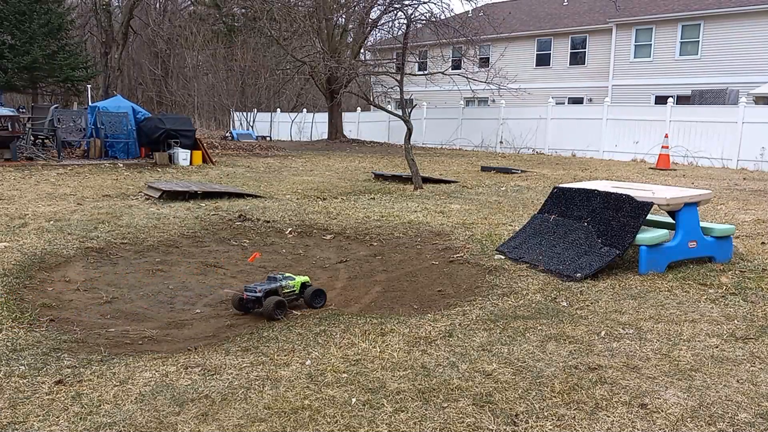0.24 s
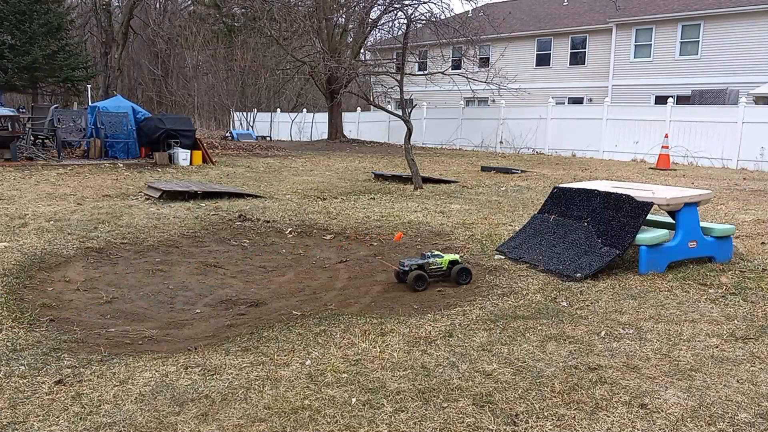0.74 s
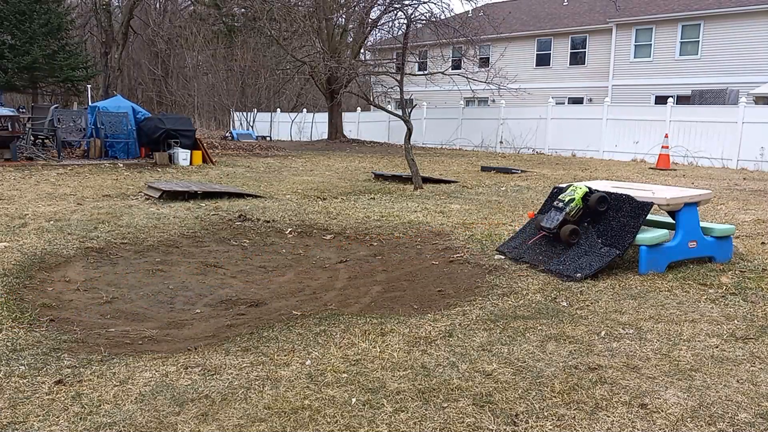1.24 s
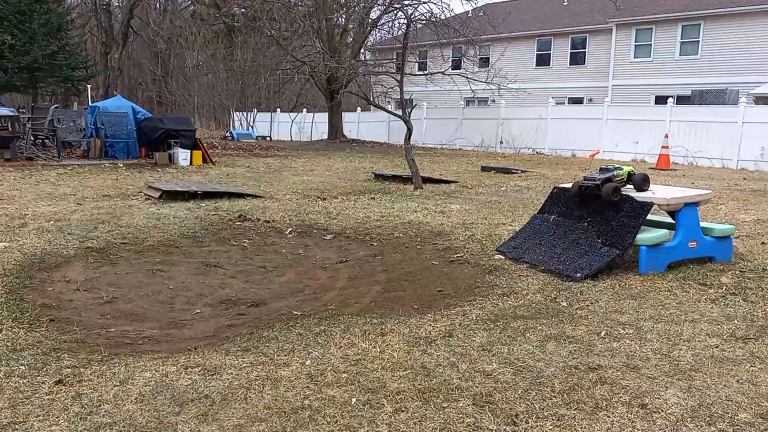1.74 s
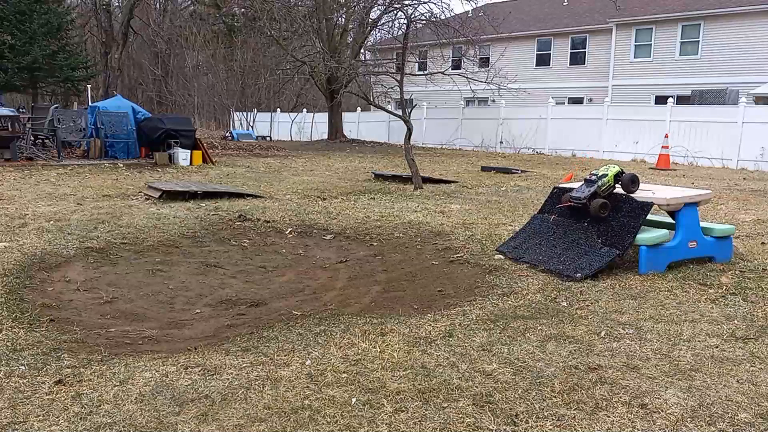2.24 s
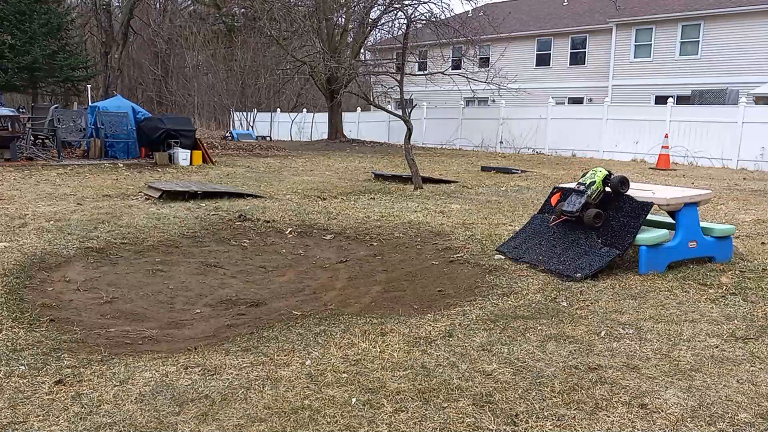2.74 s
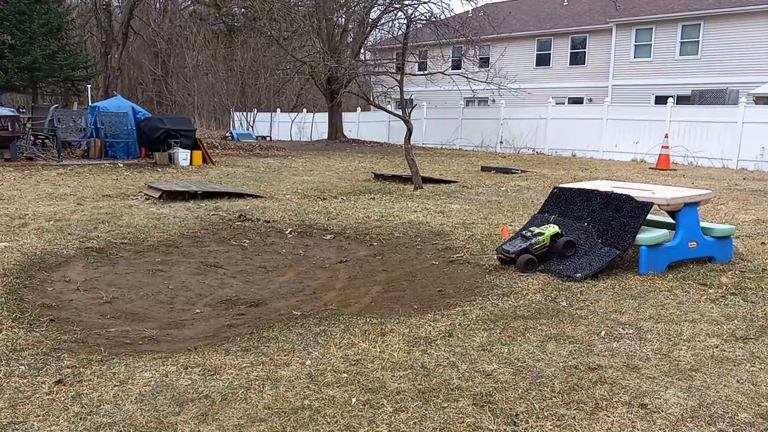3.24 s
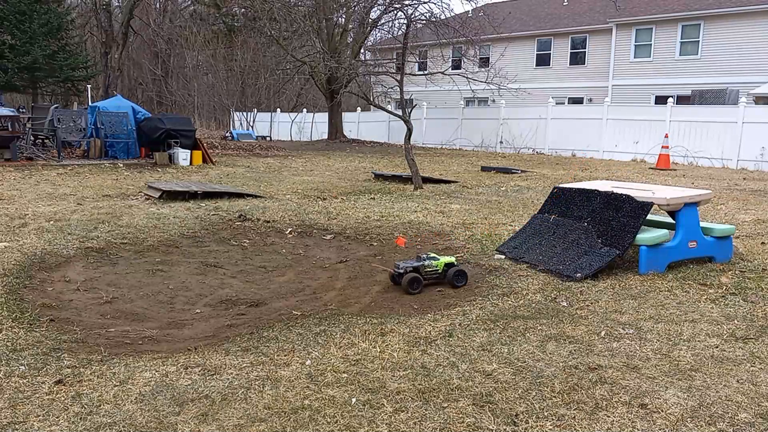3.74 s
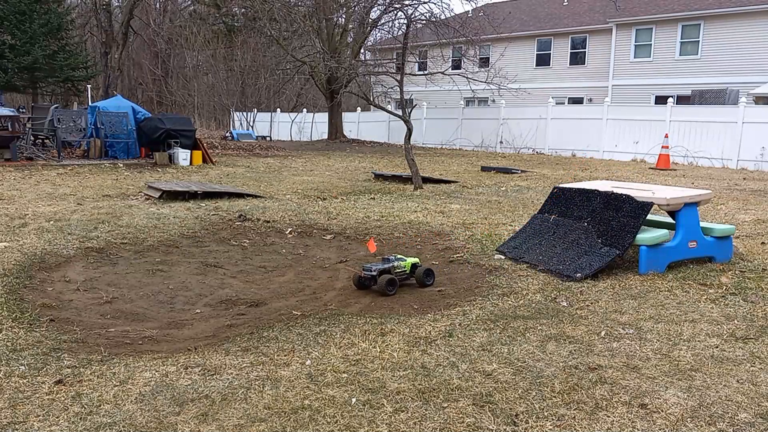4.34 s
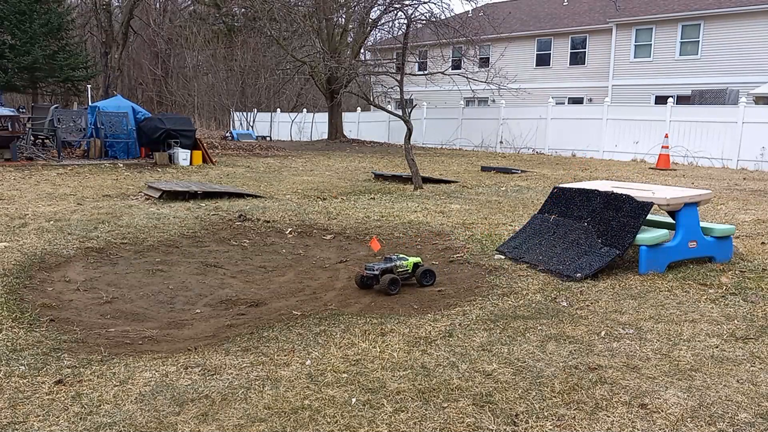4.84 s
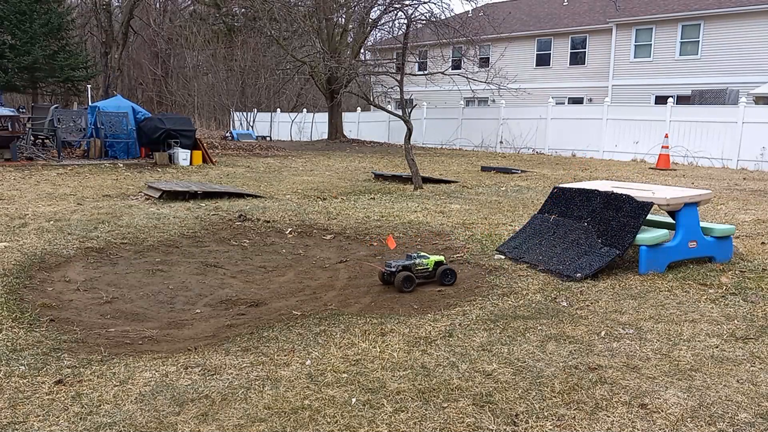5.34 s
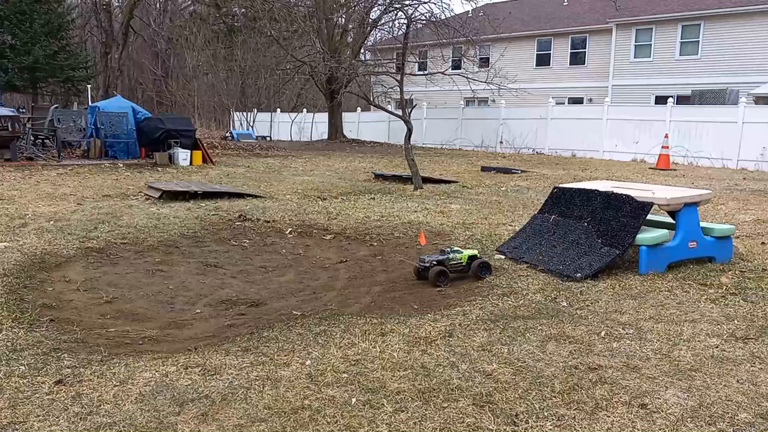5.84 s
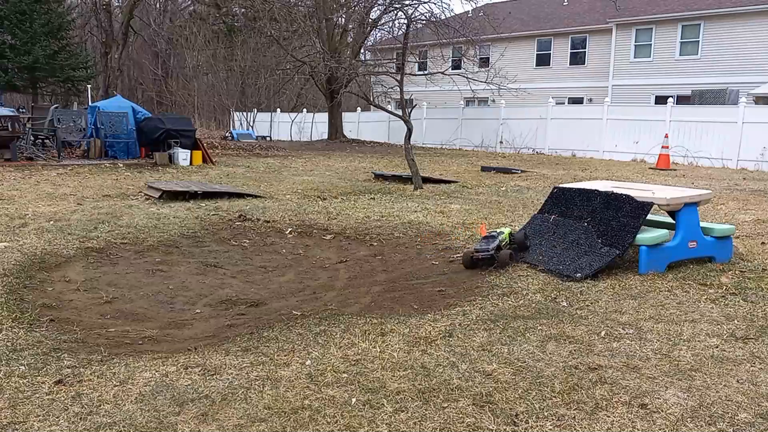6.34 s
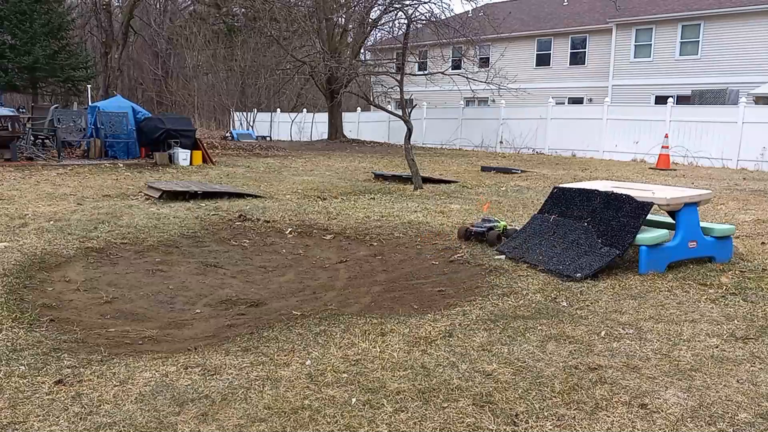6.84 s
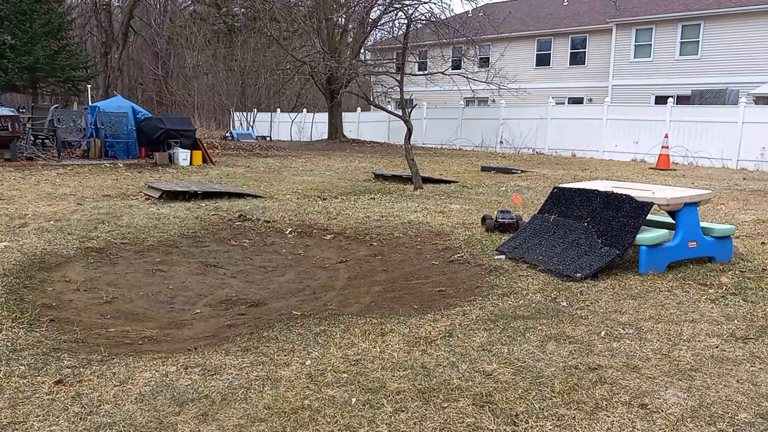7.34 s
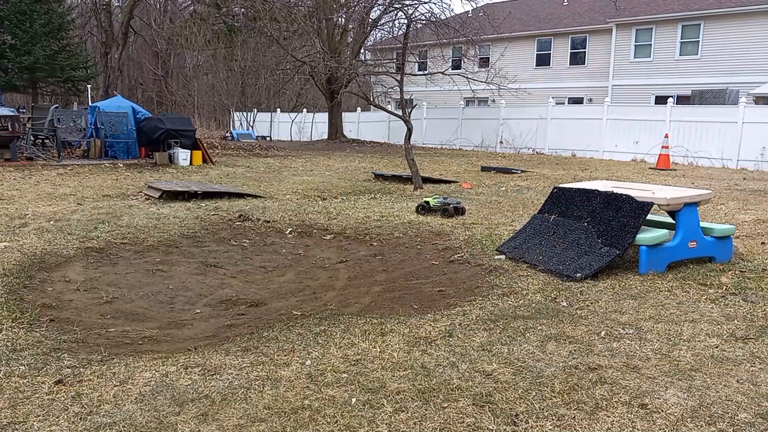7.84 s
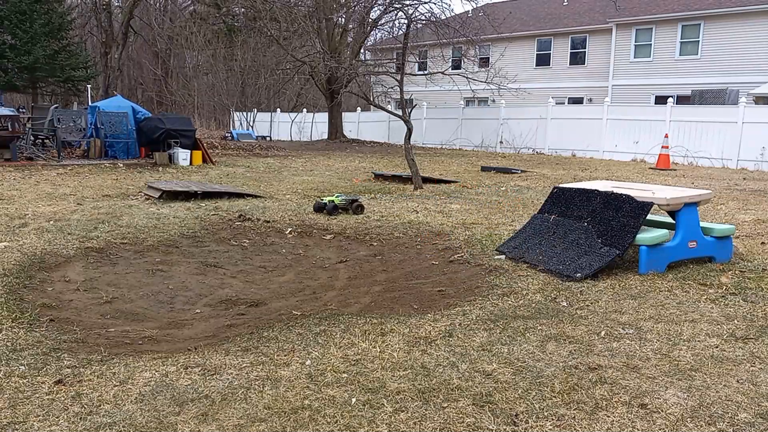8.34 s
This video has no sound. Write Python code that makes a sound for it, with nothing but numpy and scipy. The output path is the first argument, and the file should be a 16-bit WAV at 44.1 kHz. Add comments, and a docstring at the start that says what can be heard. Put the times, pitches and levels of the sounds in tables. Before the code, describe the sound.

A small electric radio-controlled truck drives close by in a backyard, its gears whining and rasping with each blip of the throttle. The tyres scrub over dirt and drum up a ramp, where the plastic chassis knocks hard twice. Short pulls with thin squeaks follow, then a longer run, a sharp clack, and the truck drives away. An engine drones in the distance and a breeze swells on the microphones at the end.

```python
"""A yard of dirt and dry grass, two microphones close to a small electric radio-controlled truck.
It is moving from the start, gears whining and rasping with each blip of the throttle, while an engine
drones far off and a house front sends back an echo. The tyres scrub and drum up a ramp, and the plastic
chassis knocks hard near 1.6 and 2.4 s. From 3 to 5.5 s the truck goes in short pulls, with thin squeaks.
It comes back down, clacks sharply at 6.7 s and drives away as the breeze swells on the microphones."""
import sys
import numpy as np
from scipy import signal
from scipy.fft import rfft, irfft, next_fast_len
from scipy.io import wavfile
from scipy.ndimage import uniform_filter1d, map_coordinates

SR = 44100
rng = np.random.default_rng(int(sys.argv[2]) if len(sys.argv) > 2 else 0)


def wav_out(sig):
    """Save sig, one row per channel (or a flat mono array), as 16-bit PCM at SR to the path in sys.argv[1]."""
    wavfile.write(sys.argv[1], SR, np.round(np.clip(np.atleast_2d(sig).T, -1, 1) * 32767).astype(np.int16))


N = 379260
TIME = np.arange(N) / SR

# pulls of the throttle, whine and tyres relative to the rasp:
# start_s, held_s, aimed_tooth_hz, spin_up_s, coast_s, rasp_db, whine_db, tyre_db
THROTTLE = [(-0.28, 0.98, 1511, 0.029, 0.07, -32.5, 3.5, -5.0),
            (0.641, 0.912, 6681.34, 0.241, 0.291, -30.5, -2, -8.5),
            (1.948, 0.478, 5099, 0.07, 0.104, -33.5, -1.5, -7.5),
            (2.973, 0.832, 445.427, 0.106, 0.209, -29, -22, -4),
            (3.585, 0.76, 994.384, 0.274, 0.118, -34.5, -0.5, -2.0),
            (4.942, 0.24, 2100.84, 0.044, 0.086, -31.5, 3.5, -4),
            (5.39, 0.19, 2992, 0.049, 0.149, -29.5, -2.0, -4.5),
            (5.74, 0.192, 3103, 0.03, 0.086, -30, -7, -6.5),
            (5.974, 0.616, 5916, 0.213, 0.447, -31.5, -1.5, -6),
            (7.107, 1.051, 4504, 0.08, 0.29, -37.5, -2, -7),
            (8.344, 0.308, 1442, 0.017, 0.086, -37, 3, 1.5)]
# the motor flares as a bump frees the wheels and sags as they grip: centre_s, width_s, speed_share
FLARES = [(.024, .018, .35), (.11, .012, .2), (0.151, .01, -.1), (0.199, .02, .18), (.253, .012, .35),
          (0.411, .032, .23), (0.548, .012, .16), (.83, .012, -.09), (1.335, .025, .2), (2.093, .025, .33),
          (3.732, .025, .57), (3.946, .025, .38), (4.04, .024, .18), (4.309, .033, .48), (5.033, .016, .45),
          (5.08, .01, .33), (5.131, .009, .42), (5.152, .008, -.13), (5.875, .025, .1), (6.31, .012, .12),
          (7.51, .022, .09), (7.625, .018, .26), (7.659, .01, -.12), (7.699, .008, .1), (7.746, .011, .22),
          (7.79, .013, .2), (7.87, .014, -.2), (7.94, .01, -.14), (7.967, .012, .24), (8.011, .012, .27),
          (8.04, .01, -.26), (8.475, .017, .3), (8.519, .012, -.1), (8.588, .024, .37)]
# how hard the ground loads the gears: time_s, gain_db
TRACTION = [(.65, -1.5), (1.08, -1), (1.2, 0), (1.36, -0.5), (1.55, -6), (1.72, 6), (2.05, 3), (2.4, 1.5),
            (2.95, 5), (3.17, -0.5), (3.58, -7), (3.95, 0.5), (4.3, 1.5), (5, 1), (6.05, 0), (6.42, -0.5),
            (6.6, -2.5), (7.15, -1), (7.7, 2.5), (8.3, 0)]
# the teeth sing best between a crawl and full speed: tooth_hz, gain_db
WHINE_RANGE = [(100, -50), (450, -3), (700, -1), (4500, 1), (6500, -8)]
# colour the gearbox gives the whine's overtones: frequency_hz, gain_db
GEARBOX = [(300, 5), (900, -5), (1700, -1.5), (2650, 1), (3500, -15), (5200, 4.5), (6800, 8), (8500, -6),
           (16000, -9)]
# colour of the plastic chassis: frequency_hz, gain_db
CHASSIS = [(500, -23), (1000, -6), (1500, -0.5), (2400, -8), (3400, 0), (5200, 3), (6700, -1.5), (8200, -6),
           (9700, -10), (12000, -9.5), (16000, -18.5)]
# ringing of the gear case and of the body shell: pitch_hz, width_hz, gain_db
CASING_MODES = [(5400, 470, 5), (6680, 540, 3.5)]
SHELL_MODES = [(1483, 288, -14.5), (2478, 1200, -3)]
# how well the shell radiates towards the microphones: time_s, gain_db
FACING = [(3, -9), (3.7, -11), (4.15, -2), (5, -18), (5.9, -4.5), (7.3, -34), (8.6, -34)]
# orders of the unbalanced motor shaft: multiple, gain_db
SHAFT_ORDERS = [(1, -1), (2, 5.5), (3, 5), (4, 9), (5, -14)]
# shaft buzz of unloaded wheels: time_s, level_db
FREE_SPIN = [(1.9, -49), (2.1, -48), (2.27, -42), (2.34, -30.5), (2.5, -49), (6, -83), (6.45, -62),
             (7, -80)]
# colours of the rolling tyres and of the grit they fling: frequency_hz, gain_db
TYRES = [(80, -1.5), (170, -2.5), (400, -2), (580, 1), (850, -5), (1300, -8.5), (2200, -11.5),
         (6000, -28.5)]
SPRAY = [(1500, -6), (4000, -13), (7500, 0.5), (9700, -10), (12000, 2), (16000, -2.5)]
# ringing of the ramp's panel: pitch_hz, width_hz, gain_db
RAMP_MODES = [(234.4, 37, -4), (329, 102, -2.5)]
# the panel's drumming against the tyre noise: time_s, gain_db
ON_RAMP = [(.9, -2), (1.2, 0), (1.6, -31), (2.45, -3.5), (5.9, -14.5), (6.25, -3.5), (6.8, -51)]
# the far engine's strongest order: time_s, pitch_hz, level_db
ENGINE = [(0, 90, -40), (.2, 89, -30), (.9, 87, -27.5), (1.7, 85, -25), (2.5, 88, -30), (3.15, 87, -31.5),
          (3.4, 82, -43), (3.8, 74, -46), (4.5, 76, -60), (4.9, 77, -40), (5.5, 77, -35), (6, 76, -50),
          (8.6, 76, -53)]
# its orders against the strongest: multiple, gain_db
ENGINE_ORDERS = [(1, 0), (11 / 8, -8.5), (14 / 8, -12.5), (17 / 8, -28.5)]
# its second harmonic: time_s, level_db
ENGINE_OCTAVE = [(0, -63), (3.4, -47.5), (3.8, -48.5), (4.5, -62), (4.9, -36.5), (5.4, -40.5), (6, -47),
                 (8.6, -63)]
# colours of the neighbourhood's murmur and of wind on a microphone: frequency_hz, gain_db
YARD = [(20, -43), (70, 5.5), (150, 2), (300, -9), (500, -18), (780, -14.5), (1300, -23.5), (1900, -26.5),
        (2800, -38.5), (6000, -38), (16000, -48)]
WIND_RUMBLE = [(12, -46), (20, -26), (76, 3.5), (300, -19.5), (390, -28), (660, -120)]
# breeze on the microphones: time_s, level_db
BREEZE = [(0, -39), (1, -33), (2.5, -52), (3.3, -39.5), (3.7, -61), (4.6, -60), (5.4, -45.5), (6.6, -36.5),
          (7.1, -40.5), (7.5, -35), (7.98, -39.5), (8.1, -22), (8.35, -32.5), (8.6, -28.5)]
# chassis contacts, thump relative to the level: start_s, level_db, thump_db
KNOCKS = [(0.2624, -34, -6), (1.6407, -16, -0.5), (1.6613, -19, -6), (2.3941, -19, 4), (2.423, -20.5, 3.5),
          (2.6435, -43, -1), (2.7802, -40, -5.5), (3.0463, -36, -3.5), (3.31, -33, -12), (3.47, -37, -1),
          (3.567, -44.5, 3), (3.84, -40.5, 3.5), (4.929, -40, -4), (4.9533, -39, 3), (5.3976, -33, -6),
          (6.6729, -13, -16), (6.75, -29, -4), (6.891, -34, -15), (8.3397, -26, -11)]
# colour of the hollow thump: frequency_hz, gain_db
THUMP = [(70, -27), (170, -4.5), (260, -15), (600, -19), (1200, -9), (2500, -10.5), (8000, -32)]
# the tread growls as a spinning wheel grips: start_s, length_s, start_hz, end_hz, level_db
SCRUBS = [(.82, 0.16, 492, 643, -36), (1.638, 0.044, 1313, 793, -32.5), (2.39, 0.066, 779, 168, -22),
          (2.44, .09, 421, 240, -34.5), (3.701, 0.066, 691, 647, -47.5), (3.841, 0.061, 647, 682, -44),
          (5.818, .06, 539, 582, -40.5), (6.13, 0.16, 401, 522.5, -36.5), (6.223, 0.068, 282, 238, -33.5),
          (6.64, 0.059, 567, 333, -37), (7.34, 0.082, 683, 434, -45), (7.85, 0.41, 620, 567, -42.5)]
# the tyres dig in on a landing or a hard bump: start_s, held_s, level_db
CRUNCHES = [(1.05, 0.38, -32), (1.645, 0.046, -27.5), (2.406, 0.02, -18.5), (3.484, 0.0075, -42),
            (4.452, 0.0079, -46.5), (5.84, 0.044, -34), (6.211, 0.062, -30), (6.65, .012, -30.5),
            (7.63, 0.037, -31)]
# thin squeaks while the truck is nearly at rest: start_s, held_s, pitch_hz, level_db
SQUEAKS = [(3.104, .11, 3444, -49), (4.398, .05, 4823, -57), (4.398, 0.049, 9060, -66),
           (4.396, 0.055, 10510, -65), (4.803, 0.069, 2202, -60.5), (4.805, 0.061, 5700, -62.5),
           (5.267, .085, 4829, -49.5), (5.266, 0.08, 10740, -64)]
# where the truck is, positive to the right of the microphones: time_s, left_lag_us
BEARING = [(0, -150), (.7, 3.5), (1.15, 122), (1.5, 159), (3.2, 129), (3.9, 8), (5.3, 17), (5.9, 52),
           (6.4, 85), (6.9, 68), (7.5, 80), (8, 40), (8.6, -66)]

SWITCH_HZ, TOP_HZ = 8050, 15850  # the speed controller's tone; the upper band limit
REFERENCE_HZ, REST_HZ = 3000, 30  # tooth rates: where speed adds no gain, and at rest
RASP_DB_PER_OCTAVE, WHINE_DB_PER_OCTAVE, TYRE_DB_PER_OCTAVE = 6, 5, 4.5  # faster is louder
LOAD_DB, WHINE_LOAD_DB = 2.5, 2.5  # teeth pressed together while the truck gathers speed
COAST_DB, WHINE_COAST_DB = -2, -2.5  # coasting teeth are slack and rattle more than they sing
RASP_FLARE_DB, WHINE_FLARE_DB = 2, 4.5  # gain per share of flare
RASP_SLACK_DB, WHINE_SLACK_DB, TAKE_UP_S = -1, -13, 0.013  # soft until the gears' play is taken up
RASP_FADE_DB, WHINE_FADE_DB = -7.5, -8.5  # further loss from letting go to standstill
UNSETTLED_DB, SING_AFTER_S = -12, .035  # the whine is weaker until the teeth settle into a tone
JOLT_DB, JOLTS_PER_S = 1.0, 21  # uneven ground shakes the rasp
WHINE_FLICKER_DB, FLICKERS_PER_S = 2, 35  # the mesh sings in fits
HUNT_SHARE, HUNTS_PER_S = .02, 32  # the wheels slip and grip while the speed changes
BLEND_S = 0.004  # the gears take up a change of load over this time
SETTLE_DB, SETTLE_S = -14, 0.048  # after-rattle of loose parts
CRUNCH_RISE_DB_PER_S, CRUNCH_FALL_DB_PER_S = 1506, 213


def amp(db):
    """Decibels to gain."""
    return 10 ** (np.asarray(db) / 20)


def unit(x):
    """Scale to rms 1."""
    return x / np.sqrt(np.mean(x ** 2) + 1e-20)


def along(points, hz):
    """Read (frequency_hz, value) points on a log axis."""
    point_hz, values = np.transpose(points)
    return np.interp(np.log(np.abs(hz) + 1), np.log(point_hz + 1), values)


def curves(rows):
    """One value per sample for each column after the time."""
    time_s, *columns = np.transpose(rows)
    return [np.interp(TIME, time_s, column) for column in columns]


def wobble(rate):
    """A smooth random curve with rate knots a second."""
    return map_coordinates(rng.standard_normal(int(N * rate / SR) + 4), [TIME * rate], mode="nearest")


def phase_of(hz):
    """Running angle of a changing frequency."""
    return 2 * np.pi * np.cumsum(hz) / SR


def filtered(x, response):
    """x through a response given as a function of frequency."""
    size = next_fast_len(N + SR // 2)
    return irfft(rfft(x, size) * response(np.fft.rfftfreq(size, 1 / SR)), size)[..., :N]


def coloured(x, spectrum):
    """x through a (frequency_hz, gain_db) colour that keeps the power of white noise."""
    return filtered(x, lambda hz: unit(amp(along(spectrum, hz))))


def scattered(apart):
    """Stereo noise of rms 1, partly unlike at the two microphones."""
    return unit(rng.standard_normal(N) + apart * rng.standard_normal((2, N)))


def grains(per_s, spread_db):
    """Tiny impacts of random size, rms 1."""
    hit = rng.random(N) < per_s / SR
    return unit(hit * rng.choice([-1, 1], N) * amp(spread_db * np.minimum(rng.exponential(size=N), 4)))


def add(track, start_s, sound):
    """Mix a sound in at start_s."""
    part = track[max(round(start_s * SR), 0):][:len(sound)]
    part += sound[:len(part)]


def drive():
    """The motor spins up at each pull and friction slows it evenly; speed and load set the levels."""
    start, held, aim_hz, spin_up, coast, *levels = np.transpose(THROTTLE)[:, :, None]
    age = np.maximum(TIME - start, 0)
    loads = np.exp(-np.minimum(age, held) / spin_up)
    coasted = np.clip((age - held) / coast, 0, 1)
    rates = aim_hz * (1 - loads) * (1 - coasted)
    pull = rates.argmax(axis=0)  # the pull that drives the motor fastest rules
    ruling = lambda x: np.broadcast_to(x, rates.shape)[pull, np.arange(N)]
    eased = lambda x: uniform_filter1d(ruling(x) * 1.0, int(BLEND_S * SR))
    flare = sum(share * np.exp(-.5 * ((TIME - s) / width) ** 2) for s, width, share in FLARES)
    hunt = HUNT_SHARE * np.sqrt(np.maximum(ruling(loads), ruling(coasted))) * wobble(HUNTS_PER_S)
    tooth_hz = np.maximum(ruling(rates), REST_HZ) * (1 + flare) * (1 + hunt)

    octaves = np.log2(tooth_hz / REFERENCE_HZ)
    slack = np.exp(-ruling(age) / TAKE_UP_S)
    unsettled = np.exp(-(ruling(age) / SING_AFTER_S) ** 2)
    load, coasting, spent = eased(loads), eased(age > held), eased(coasted)
    pull_db, sing_db, grip_db = [eased(db) for db in levels]
    effort_db = pull_db + curves(TRACTION)[0] + LOAD_DB * load + COAST_DB * coasting
    rasp_db = (effort_db + RASP_DB_PER_OCTAVE * octaves + RASP_FLARE_DB * flare
               + RASP_SLACK_DB * slack + RASP_FADE_DB * spent + JOLT_DB * wobble(JOLTS_PER_S))
    whine_db = (effort_db + sing_db + WHINE_DB_PER_OCTAVE * octaves + along(WHINE_RANGE, tooth_hz)
                + WHINE_SLACK_DB * slack + UNSETTLED_DB * unsettled + WHINE_LOAD_DB * load
                + WHINE_COAST_DB * coasting + WHINE_FADE_DB * spent
                + WHINE_FLARE_DB * flare + WHINE_FLICKER_DB * wobble(FLICKERS_PER_S))
    rolling_db = pull_db + grip_db + TYRE_DB_PER_OCTAVE * octaves
    return tooth_hz, whine_db, after_rattle(rasp_db), rolling_db


def after_rattle(rasp_db):
    """Loose parts go on rattling after the drive stops: the rasp's level with a short tail, in dB."""
    keep = np.exp(-1 / (SETTLE_S * SR))
    power = amp(rasp_db) ** 2
    tail = signal.lfilter([1 - keep], [1, -keep], power)
    return 10 * np.log10(power + amp(SETTLE_DB) ** 2 * tail)


def gears(tooth_hz, whine_db, rasp_db):
    """Meshing teeth sing at their rate and rattle the chassis; the unbalanced motor shaft buzzes."""
    speed = tooth_hz / tooth_hz.max()
    mesh = phase_of(tooth_hz * (1 + (.01 + .025 * speed) * wobble(70)))  # bumps load and free the wheels
    shaft = mesh / 10  # one turn in ten teeth
    force = scattered(apart=0.81) + 0.38 * grains(2500, spread_db=4.0)  # no two teeth strike alike
    strikes = unit(force * (1 + 0.61 * np.cos(mesh)) * (1 + 0.1 * np.cos(shaft)))
    rattle = amp(-4.5) * coloured(ragged(strikes), CHASSIS) + amp(-24) * ringing(strikes, CASING_MODES)
    shell_db = curves(FACING)[0] + 2 - 18 * speed  # slow, loaded teeth knock the shell hardest
    rattle += amp(shell_db) * ringing(strikes, SHELL_MODES)
    rasp = amp(rasp_db + 1.58 * wobble(70)) * rattle
    buzz = unit(sum(amp(db) * np.sin(k * shaft) for k, db in SHAFT_ORDERS))
    # the controller chops the current, which is heard at low speed
    switching = amp(whine_db - 12 - 60 * speed + 3.5 * wobble(25)) * np.sin(2 * np.pi * SWITCH_HZ * TIME)
    song = amp(whine_db - 3) * whine(tooth_hz, mesh, speed)
    return song + rasp + amp(curves(FREE_SPIN)[0] + 2.64 * wobble(60)) * buzz + switching


def ragged(x):
    """Loose parts ring briefly at ever-changing pitches, so the rasp comes in small patches."""
    spectra = signal.stft(x, nperseg=512)[2]
    patches = uniform_filter1d(rng.standard_normal(spectra.shape[1:]), 3, axis=0)
    patches = uniform_filter1d(patches, 6, axis=1)
    return unit(signal.istft(spectra * amp(3.2 * unit(patches)), nperseg=512)[1][:, :N])


def ringing(x, modes):
    """x through resonances whose strengths flicker as the truck shakes."""
    def band(hz, width):
        return unit(filtered(x, lambda f: (1j * f * width / (hz * hz - f * f + 1j * f * width)) ** 2))
    return unit(sum(amp(db + 2.5 * wobble(40)) * band(hz, width) for hz, width, db in modes))


def whine(tooth_hz, mesh, speed):
    """The tooth tone and its overtones, rms 1; backlash smears them, more so at speed."""
    rough = .55 + .42 * speed
    teeth = mesh / (2 * np.pi)
    out = np.zeros(N)
    for k in range(1, 5):
        knots = rng.standard_normal((2, int(teeth[-1]) + 4))
        sine_gain, cosine_gain = [map_coordinates(row, [teeth * k ** .5 / 5]) for row in knots]
        smear = (sine_gain * np.sin(k * mesh) + cosine_gain * np.cos(k * mesh)) / np.sqrt(2)
        tone = np.sqrt(1 - rough ** 2) * np.sin(k * mesh) + rough * smear
        falloff_db = (k > 1) * (5 - 56 * speed) - 3.53 * (k - 1)
        colour_db = along(GEARBOX, k * tooth_hz) - along(GEARBOX, tooth_hz)
        out += amp(falloff_db + colour_db) * (k * tooth_hz < TOP_HZ) * tone
    return unit(out * amp(3.3 * wobble(100)))


def tyres(tooth_hz, rasp_db, tyre_db):
    """Lugs patter on the ground and drum on the ramp; fast wheels fling a spray of grit."""
    patter = coloured(unit(scattered(apart=0.7) + grains(250, spread_db=2.0)), TYRES)
    roll_db = tyre_db - 6.5 + 2.6 * wobble(40)
    drumming = amp(curves(ON_RAMP)[0]) * ringing(scattered(apart=0.16), RAMP_MODES)
    grit = ragged(scattered(apart=3.6) + 0.5 * grains(1500, spread_db=4.0))
    spray_db = rasp_db - 25.5 + 19 * tooth_hz / tooth_hz.max() + 2.7 * wobble(60)
    return amp(roll_db) * (patter + drumming) + amp(spray_db) * coloured(grit, SPRAY)


def far_engine():
    """An engine well beyond the yard: its low orders make a dull, slowly drifting drone."""
    pitch_hz, level_db = curves(ENGINE)
    angle = phase_of(pitch_hz * (1 + .014 * wobble(9)))
    drone = sum(amp(level_db + db + 1.8 * wobble(11)) * np.sin(k * angle) for k, db in ENGINE_ORDERS)
    return drone + amp(curves(ENGINE_OCTAVE)[0] + 1.1 * wobble(3.3)) * np.sin(2 * angle)


def neighbourhood():
    """The steady, low murmur all around the yard."""
    return amp(-45.5) * coloured(scattered(apart=1.0), YARD)


def breeze():
    """Wind rumbles right on the microphones, in lumps that the two only partly share."""
    lumps_db = 2.4 * np.array([wobble(16), wobble(16)]) + 2.2 * wobble(15)
    return amp(curves(BREEZE)[0] - 0.5 + lumps_db) * coloured(scattered(apart=0.96), WIND_RUMBLE)


def knocks():
    """Each chassis contact is a short plastic clack and a longer hollow thump."""
    clack, thump, t = np.zeros(N), np.zeros(N), np.arange(SR // 3) / SR
    for start_s, db, thump_db in KNOCKS:
        add(clack, start_s, amp(db - 10 - 60 * t / 0.039) * rng.standard_normal(len(t)))
        add(thump, start_s, amp(db + thump_db - 6.5 - 60 * t / 0.14) * rng.standard_normal(len(t)))
    return coloured(clack, CHASSIS) + coloured(thump, THUMP)


def scrubs():
    """Tread blocks slap the ground at a gliding, uneven rate."""
    out, unevenness = np.zeros(N), wobble(350)
    for start_s, length_s, start_hz, end_hz, db in SCRUBS:
        progress = np.linspace(0, 1, int(length_s * SR))
        glide_hz = start_hz + (end_hz - start_hz) * progress
        angle = phase_of(glide_hz * (1 + 0.0895 * unevenness[round(start_s * SR):][:len(progress)]))
        growl = np.sin(angle) + 0.11 * np.sin(2 * angle) + 0.036 * np.sin(3 * angle)
        add(out, start_s, amp(db + 3.5) * np.abs(np.sin(np.pi * progress)) ** 0.21 * growl)
    return out * (1 + 0.62 * wobble(250))


def crunches(rolling_db):
    """Tyres dig in on landings and bumps: the rolling level with these bursts added, in dB."""
    power = amp(rolling_db) ** 2
    for start_s, held_s, db in CRUNCHES:
        rise_db = CRUNCH_RISE_DB_PER_S * np.maximum(start_s - TIME, 0)
        fall_db = CRUNCH_FALL_DB_PER_S * np.maximum(TIME - start_s - held_s, 0)
        power += amp(db - rise_db - fall_db) ** 2
    return 10 * np.log10(power)


def squeaks():
    """The chassis squeaks in pure, thin tones that start at once, flutter and ring away."""
    out, t = np.zeros(N), np.arange(SR // 2) / SR
    attack = 1 - np.exp(-t / .002)
    flutter = 1 + .4 * np.sin(2 * np.pi * t / .08)
    for start_s, held_s, pitch_hz, db in SQUEAKS:
        ring_s = np.interp(pitch_hz, [4000, 10000], [.65, .35])
        fade_db = -60 * np.maximum(t - held_s, 0) / ring_s
        add(out, start_s, amp(db + fade_db) * flutter * attack * np.sin(2 * np.pi * pitch_hz * t))
    return out * amp(2 * wobble(70))


def microphones(pair):
    """The truck's sound reaches the nearer microphone first."""
    lag_samples = curves(BEARING)[0] * SR / 1e6
    return np.array([map_coordinates(x, [np.arange(N) + side * lag_samples / 2], order=5)
                     for x, side in zip(pair, (-1, 1))])


def echoes(pair):
    """Fence and trees scatter a short wash; the house front answers 77 ms after the truck."""
    hz, t, spectra = signal.stft(rng.standard_normal((2, SR // 2)), SR, nperseg=256)
    decay_s = along([(200, 0.43), (4000, 0.25), (14000, 0.055)], hz)
    wash = signal.istft(spectra * amp(-60 * t / decay_s[:, None]), SR, nperseg=256)[1]
    answer = amp(-11) * wash / np.linalg.norm(wash[0])
    answer[:, round(.077 * SR)] += amp(-34.5)
    return signal.fftconvolve(pair, answer, axes=1)[:, :N]


def scene():
    """The truck close by in the yard, the engine far behind it, the breeze on the microphones."""
    tooth_hz, whine_db, rasp_db, rolling_db = drive()
    truck = gears(tooth_hz, whine_db, rasp_db) + tyres(tooth_hz, rasp_db, crunches(rolling_db))
    truck = truck + scrubs() + knocks() + squeaks()
    yard = microphones(truck) + echoes(truck) + far_engine() + neighbourhood() + breeze()
    return yard * amp([[-.3], [.3]])  # the right microphone is a touch louder


def record(dry):
    """Both channels are cut off at the upper band limit."""
    return filtered(dry, lambda hz: hz < TOP_HZ)


dry = scene()
out = record(dry)
wav_out(out)
```